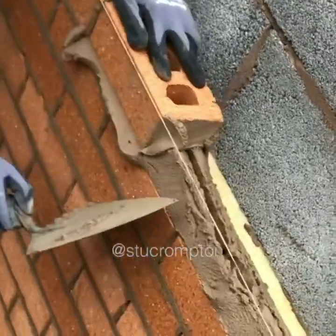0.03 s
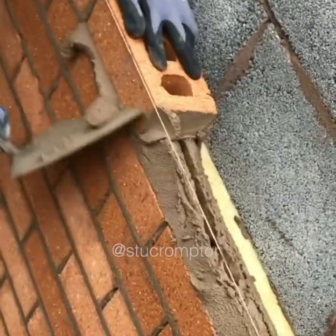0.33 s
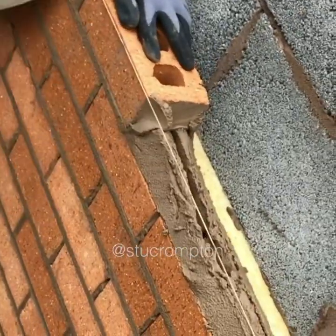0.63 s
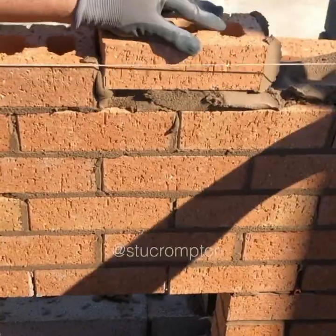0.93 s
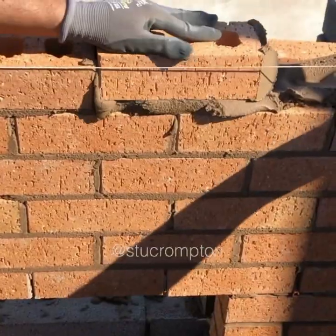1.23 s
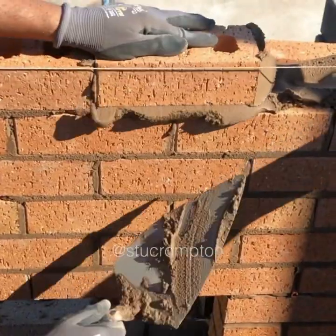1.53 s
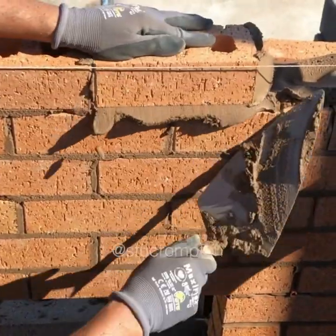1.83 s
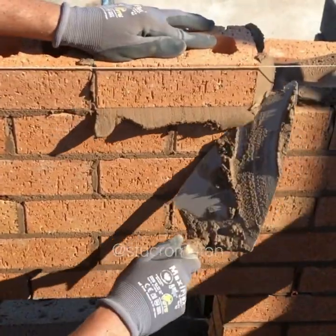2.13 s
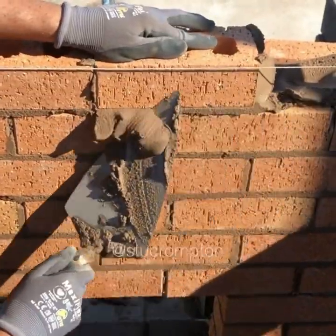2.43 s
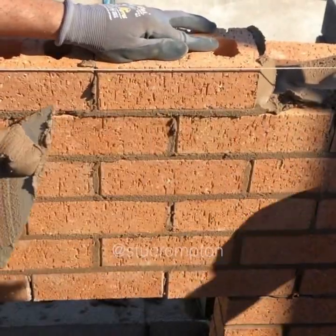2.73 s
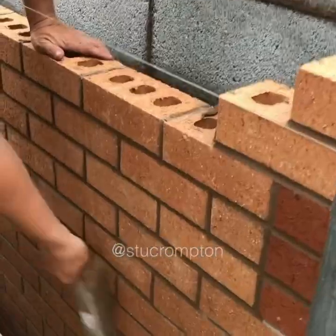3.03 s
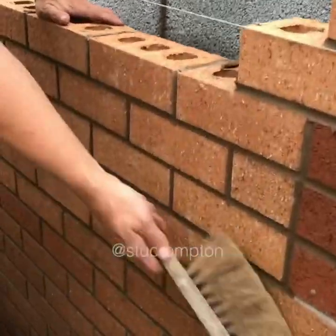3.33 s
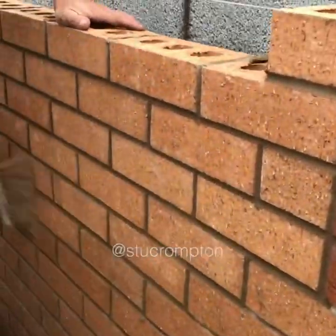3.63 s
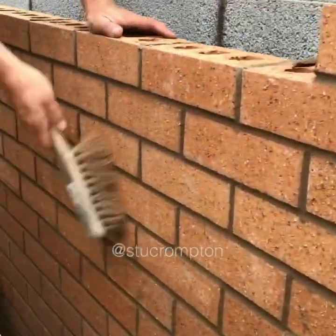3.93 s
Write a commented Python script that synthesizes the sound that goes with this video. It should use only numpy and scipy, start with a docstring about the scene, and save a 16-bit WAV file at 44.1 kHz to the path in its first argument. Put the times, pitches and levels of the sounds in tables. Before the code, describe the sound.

A steel trowel knocks on brick and scrapes through wet mortar, close up outdoors, until about 0.7 seconds. A brick rubs softly into place around 1 second. Two more gritty, squelching strokes with taps follow at 1.2 to 1.6 and 2 to 2.8 seconds. A hand brush sweeps faintly near 3, knocks at 3.4, then rasps louder from 3.7 to 4. Soft bumps, hiss and air rumble lie underneath.

```python
"""Outdoors at a brick wall, one mono microphone close to the bricklayer's hands. A steel trowel knocks on the
bricks and cuts off wet mortar in three gritty strokes: sand cracks, the mortar squelches, the blade rings
faintly. After the first stroke a brick rubs into its bed. Last, a hand brush knocks on the wall and its
bristles sweep the joints. Soft bumps, hiss and a light rumble of air on the microphone lie underneath."""
import sys
import numpy as np
from scipy import signal
from scipy.fft import rfft, irfft, next_fast_len
from scipy.io import wavfile

SR = 44100
rng = np.random.default_rng(int(sys.argv[2]) if len(sys.argv) > 2 else 0)


def transcribe(signal):
    """Save signal, clipped to [-1, 1], as a 16-bit WAV file at the path in sys.argv[1]."""
    frames = np.atleast_2d(signal).T
    limited = np.clip(frames, -1, 1)
    pcm = np.round(limited * 32767).astype(np.int16)
    wavfile.write(sys.argv[1], SR, pcm)


N = 176400
T = np.arange(N) / SR


def from_db(db):
    """Decibels to gain."""
    return 10 ** (np.asarray(db) / 20)


def rms_one(x):
    """Scale to rms 1."""
    return x / np.sqrt(np.mean(x ** 2) + 1e-20)


def curves(rows):
    """One curve a column; -120 outside the rows' span, unless that ends within 0.1 s of the scene's edge."""
    times, *columns = np.transpose(rows)
    before = -120 if times[0] > .1 else None
    after = -120 if times[-1] < T[-1] - .1 else None
    return [np.interp(T, times, column, left=before, right=after) for column in columns]


def add(out, start, x):
    """Mix x in at a start in seconds."""
    i = int(start * SR)
    out[i:i + len(x)] += x[:N - i]


def drift(per_s):
    """Smooth random wander of spread 1."""
    knots = rng.standard_normal(4000)
    return rms_one(np.interp(T * per_s, np.arange(len(knots)), knots))


def colour(x, points):
    """Causal filter through (Hz, dB) points, falling steeply past both ends."""
    n = 2 * next_fast_len(len(x) // 2 + 2048)
    hz, db = np.transpose(points)
    octave = np.log2(np.maximum(np.arange(n // 2 + 1) * SR / n, 1))
    marks = np.log2(hz)
    outside = np.abs(octave - np.clip(octave, marks[0], marks[-1]))
    gain = from_db(np.interp(octave, marks, db) - np.minimum(40 * outside, 70))
    cepstrum = irfft(np.log(gain))
    cepstrum[1:n // 2] *= 2  # folded for minimum phase
    cepstrum[n // 2 + 1:] = 0
    return irfft(rfft(x, n) * np.exp(rfft(cepstrum)))[:len(x)]


def noise(db, points):
    """Smooth coloured noise at a level."""
    return from_db(db) * rms_one(colour(rng.standard_normal(N), points))


def grains(per_s, spread_db):
    """Random clicks at steady power, their sizes spread by spread_db."""
    chance = np.clip(per_s / SR, 1e-3, 1)
    sizes = from_db(spread_db * np.minimum(rng.exponential(1, N), 4)) * rng.choice([-1, 1], N)
    return rms_one(sizes * (rng.random(N) < chance) / np.sqrt(chance))


def pinged(clicks, low_hz, high_hz, t60):
    """Turn every click into a short ring at a random pitch."""
    at = np.flatnonzero(clicks)
    t = T[:int(t60 * SR * .6)]
    hz = rng.uniform(low_hz, high_hz, N)[at, None]
    rings = clicks[at, None] * np.sin(2 * np.pi * hz * t) * from_db(-60 * t / t60)
    samples = at[:, None] + np.arange(len(t))
    return rms_one(np.bincount(samples.ravel(), rings.ravel(), N)[:N])


def burst(t60, crack_db):
    """A sharp crack and a dying crumble."""
    t = T[:SR // 8]
    contact = rng.standard_normal(len(t)) * from_db(-60 * t / t60)
    contact /= np.linalg.norm(contact)
    contact[0] += from_db(crack_db)
    return contact


def at_level(x, db):
    """Give a blow the energy of 10 ms at this level."""
    return x / np.linalg.norm(x) * from_db(db) * np.sqrt(SR / 100)


def thuds(rows, rise_s, sag):
    """Damped notes that sink in pitch by the fraction sag as they die."""
    out, t = np.zeros(N), T[:SR // 4]
    for start, hz, db, t60 in rows:
        phase = 2 * np.pi * np.cumsum(hz * (1 - sag * np.minimum(t / t60, 1))) / SR
        envelope = from_db(db - 60 * t / t60) * (1 - np.exp(-t / rise_s))
        add(out, start, envelope * np.sin(phase))
    return out


# Hiss behind the work and air on the microphone. Each row: time in seconds, level in dB.
HISS = [(0, -87), (.705, -87), (.72, -72), (1.2, -63), (1.7, -67.5), (1.83, -74), (2.0, -77), (2.75, -73),
        (2.8, -74), (2.888, -73), (2.896, -52), (2.99, -63), (3.13, -49), (3.24, -51), (3.36, -63),
        (3.43, -53), (4, -45.5)]
RUMBLE = [(0, -52.5), (.55, -45.5), (.76, -47.5), (.79, -58), (.84, -51.5), (1.06, -56.5), (1.18, -48),
          (1.3, -56.5), (2.0, -51.5), (2.07, -42), (2.2, -51), (2.5, -44), (2.65, -57), (2.85, -47.5),
          (3.0, -60), (3.4, -59.5), (3.55, -47.5), (3.66, -58.5), (3.8, -45), (4, -58.5)]
# Their spectra and that of the site. Each row: frequency in Hz, gain in dB.
HISS_COLOUR = [(1500, -26), (2300, -14), (3500, -4.5), (5500, 0), (9000, -1.5), (15800, -5.5)]
RUMBLE_COLOUR = [(20, -25), (40, -8.5), (62, 1.5), (110, -3), (180, -6), (300, -11), (600, -24.5),
                 (1500, -33.5)]
SITE_COLOUR = [(100, 2), (300, 4), (800, 3.5), (1800, -2), (4000, -8.5), (12000, -33)]
def air():
    """Air rumbles unevenly on the microphone, with a shifting hiss and the steady noise of the site."""
    hiss = noise(curves(HISS)[0], HISS_COLOUR)
    rumble = noise(curves(RUMBLE)[0], RUMBLE_COLOUR)
    return hiss + rumble + noise(db=-66.5, points=SITE_COLOUR)


# How the grains ring, squelch first, then sand.
# Each row: lowest and highest pitch in Hz, t60 in seconds, share of plain click in dB.
GRAIN_RINGS = [(126, 3000, 0.037, 2), (2090, 16000, 0.0056, -0.5)]
GRAINS_PER_S, REFERENCE_DB = 4500, -35  # grain rate at this level
def scrape(strokes, colours, spread_db, chatter_db):
    """Sand cracks under the edge while wet mortar squelches; pressure makes the grains denser."""
    out = np.zeros(N)
    chatter = from_db(chatter_db * drift(per_s=160))
    levels = np.max([curves(rows) for rows in strokes], axis=0)
    for db, points, (low, high, t60, click_db) in zip(levels, colours, GRAIN_RINGS):
        per_s = GRAINS_PER_S * from_db(.7 * (np.maximum(db, -55) - REFERENCE_DB))
        clicks = rms_one(grains(per_s, spread_db) * chatter)
        grit = pinged(clicks, low, high, t60) + from_db(click_db) * clicks
        out += from_db(db) * rms_one(colour(grit, points))
    return out


# The first stroke, close up. Each row: time in seconds, squelch level in dB, sand level in dB.
THICK_STROKE = [(0, -52.5, -94), (.228, -50, -86), (.25, -46.5, -54), (.335, -46.5, -49), (.40, -36, -41),
                (.46, -33, -33), (.505, -37.5, -34), (.53, -35, -41), (.555, -49, -43.5),
                (.575, -41.5, -67), (.65, -51.5, -68), (.71, -56.5, -76), (.76, -90, -63)]
# Spectra of its squelch and sand. Each row: frequency in Hz, gain in dB.
THICK_SQUELCH = [(150, -6), (280, -3), (420, 3), (600, 0), (920, 5), (1300, 0.5), (1700, 2.5),
                 (2100, -11.5), (2600, -16.5)]
THICK_SAND = [(1410, 13.5), (2400, -3), (3630, -6), (4170, -12), (6760, -17.5), (12400, -31.5),
              (15000, -42)]
def thick_stroke():
    """The trowel cuts dully through thick mortar."""
    return scrape([THICK_STROKE], (THICK_SQUELCH, THICK_SAND), spread_db=2, chatter_db=0)


# Modes of the steel blade. Each row: frequency in Hz, gain in dB, t60 in seconds.
BLADE_MODES = [(2439, 0, .07), (2940, 2, .04), (6169, 2, .09), (6481, 4, .08), (6531, 3, .08),
               (6670, 2, .07), (7595, 3, .08), (7806, 0, .08), (9080, -3, .05), (11779, 2, .09)]
def blade(contact):
    """The steel rings with whatever its edge meets; returns the contact with its ringing."""
    ringing = np.zeros(N)
    for hz, db, t60 in BLADE_MODES:
        radius = from_db(-60 / (t60 * SR))
        zeros = (1 - radius ** 2) / 2 * np.array([1, 0, -1])  # gain 1 at the peak
        poles = [1, -2 * radius * np.cos(2 * np.pi * hz / SR), radius ** 2]
        ringing += from_db(db) * signal.lfilter(zeros, poles, contact + 1e-18)
    return contact + from_db(-5.5) * ringing


def chips(low_hz, high_hz, count, t60):
    """Flakes of grit ring at random pitches after a contact, with unit energy in all."""
    t = T[:SR // 8]
    hz, phase = rng.uniform(low_hz, high_hz, (count, 1)), rng.random((count, 1))
    rings = np.sin(2 * np.pi * (hz * t + phase)).sum(axis=0) * from_db(-60 * t / t60)
    return rings / np.linalg.norm(rings)


# Four bands of a tap (body, knock, crack, tick): their edges in Hz, then their t60 in seconds.
BAND_EDGES_HZ = [300, 800, 2400, 6000, 14000]
BAND_T60_S = [0.06, 0.016, 0.024, 0.012]
# Close trowel knocks and one click. Each row: start in seconds, then body, knock, crack and tick in dB.
TAPS = [(0.242, -44.5, -43.5, -59.5, -76), (0.268, -62, -44, -64, -82), (0.29, -66, -39.5, -55, -63),
        (0.316, -38, -39, -54, -69), (0.346, -37, -34, -49, -63), (0.605, -47, -48, -77, -90),
        (.729, -68, -69, -66.5, -65), (0.808, -65, -54.5, -62.5, -75), (1.236, -43, -48.5, -40.5, -37.5),
        (1.28, -54, -44, -44.5, -52), (1.324, -57, -41, -42.5, -47), (1.4236, -37.5, -50, -62, -32.5),
        (1.458, -43, -63, -45.5, -42), (1.5583, -48, -53, -46, -37), (1.793, -50.5, -60, -64.5, -76),
        (2.032, -43, -38, -41.5, -29.5), (2.117, -53, -43.5, -48, -48), (2.157, -63, -42.5, -48, -46),
        (2.225, -69, -42.5, -42, -46), (2.271, -64, -40.5, -39, -41.5), (2.285, -66, -46.5, -43, -38.5),
        (2.330, -41, -38.5, -34.5, -27.5), (2.362, -46, -35.5, -46, -49), (2.677, -57, -43.5, -43, -42)]
def taps():
    """Trowel knocks on brick, plus one faint, thin click at 0.73 s; each has its own balance of bands."""
    out = np.zeros(N)
    for k, (low, high, t60) in enumerate(zip(BAND_EDGES_HZ, BAND_EDGES_HZ[1:], BAND_T60_S)):
        band = signal.butter(3, [low, high], "band", fs=SR, output="sos")
        for start, *levels in TAPS:
            tap = burst(t60, crack_db=-2) + from_db(-7.5) * chips(low, high, count=4, t60=.065)
            add(out, start, at_level(signal.sosfilt(band, tap), levels[k]))
    return out


# Short rings of the struck brick and, on the light contacts from 2.17 to 2.27 s, of the blade tip.
# Each row: start in seconds, pitch in Hz, level in dB, t60 in seconds.
CONTACT_RINGS = [(.243, 1244, -28, 0.072), (0.269, 1380, -32.5, 0.1), (0.317, 1380, -29.5, 0.073),
                 (.348, 2100, -30.5, 0.059), (1.236, 1038, -26.5, 0.058), (1.28, 1030, -27, 0.045),
                 (1.326, 1046, -25, 0.051), (2.174, 3040, -38, 0.065), (2.242, 2915, -30.5, 0.042),
                 (2.27, 2080, -32.5, .06), (2.331, 947, -29, 0.072), (2.334, 1503, -25.5, 0.045),
                 (2.567, 913, -29, 0.07)]
def contact_rings():
    """As the trowel meets the joint, brick or blade tip rings in a close pair of quickly dying modes."""
    upper_modes = [(start, hz * 1.074, db - 3, t60) for start, hz, db, t60 in CONTACT_RINGS]
    return thuds(list(CONTACT_RINGS) + upper_modes, rise_s=.0007, sag=.011)


# Suction in the mortar. Each row: start in seconds, pitch in Hz, level in dB, t60 in seconds.
SUCKS = [(.441, 413, -26, 0.035), (.972, 380, -27.5, 0.017), (1.427, 478, -20.5, 0.038),
         (1.457, 488, -29.5, 0.1), (1.495, 474, -38.5, 0.1), (2.333, 366, -24.5, 0.079),
         (2.61, 452, -26, 0.053)]
def sucks():
    """The wet joint sucks open with a hollow note."""
    return thuds(SUCKS, rise_s=.0022, sag=.087)


# Bumps under the work. Each row: start in seconds, pitch in Hz, level in dB, t60 in seconds.
BUMPS = [(.62, 86, -40, 0.095), (.725, 133, -35.5, 0.057), (.976, 167, -25.5, 0.043),
         (1.0, 109, -31, 0.054), (2.045, 102, -37, 0.17), (2.53, 122, -27.5, 0.053),
         (2.765, 95, -29.5, 0.068), (2.81, 156, -23, 0.032), (2.839, 296, -10.5, 0.0087),
         (2.848, 80, -31, 0.11), (2.872, 145, -23, 0.063), (3.055, 115, -32, 0.094),
         (3.48, 264, -31, 0.021), (3.495, 185, -32, 0.072)]
def bumps():
    """Soft low bumps that drop steeply in pitch."""
    return thuds(BUMPS, rise_s=.0022, sag=.55)


# The sliding brick. Each row: time in seconds, level in dB, lowest resonance in Hz.
BEDDING = [(.82, -67, 1610), (.91, -59, 1670), (.965, -53.5, 1806), (1.11, -57, 1835), (1.16, -55, 1895)]
# Its resonances. Each row: multiple of the lowest, gain in dB.
BEDDING_MODES = [(1, -1.5), (1.26, -16), (1.669, -17)]
# The broad noise of its rubbing. Each row: frequency in Hz, gain in dB.
BEDDING_COLOUR = [(250, 5), (500, -5.5), (1000, -3), (2000, -8), (9000, -23)]
def bedding(width_hz=380):
    """The brick slides into its bed; its resonances climb as it is pressed home."""
    db, hz = curves(BEDDING)
    phase = 2 * np.pi * np.cumsum(hz) / SR
    resonances = np.zeros(N)
    for ratio, mode_db in BEDDING_MODES:
        narrow_noise = drift(width_hz) * np.sin(ratio * phase) + drift(width_hz) * np.cos(ratio * phase)
        resonances += from_db(mode_db) * narrow_noise
    return (from_db(db) * resonances + noise(db, BEDDING_COLOUR)) / np.sqrt(2)


# The later strokes, one list a drag; the last two drags join into one stroke.
# Each row: time in seconds, squelch level in dB, sand level in dB.
EDGE_STROKES = [
    [(1.236, -41.5, -44.5), (1.315, -43.5, -49), (1.345, -39, -41.5), (1.405, -41, -38.5),
     (1.45, -42.5, -43.5), (1.53, -43, -45.5), (1.585, -49, -47), (1.61, -60.5, -70), (1.8, -61, -68)],
    [(2.02, -50, -52), (2.06, -63, -64), (2.105, -76, -72), (2.14, -51, -55), (2.18, -49.5, -46.5),
     (2.25, -48.5, -52.5), (2.322, -52, -55.5), (2.335, -39, -42), (2.358, -42, -47)],
    [(2.362, -36, -34), (2.38, -42, -32), (2.44, -41, -30), (2.475, -37.5, -29), (2.51, -38, -28),
     (2.575, -38.5, -30), (2.595, -39, -30.5), (2.665, -43, -37), (2.71, -55.5, -53.5), (2.755, -46, -45.5),
     (2.79, -82, -83)],
]
# Spectra of their squelch and sand. Each row: frequency in Hz, gain in dB.
EDGE_SQUELCH = [(150, -7.5), (260, -8.5), (350, 0.5), (470, -1), (600, 2.5), (730, -14.5), (950, -0.5),
                (1300, -3), (1600, -5), (2000, -13.5), (2600, -12.5)]
EDGE_SAND = [(2400, -11), (3200, -4.5), (4800, -4.5), (6600, -0.5), (8300, 1.5), (10500, -5), (12700, -5.5),
             (15800, -6.5)]
def edge_strokes():
    """The trowel's edge drags along the brick face, bright and chattering."""
    return scrape(EDGE_STROKES, (EDGE_SQUELCH, EDGE_SAND), spread_db=3, chatter_db=1.5)


# Lumps of grit. Each row: start and length in seconds, then knock, crack and tick levels in dB.
CRUNCHES = [(1.358, 0.011, -37.5, -47, -37.5), (1.373, .014, -46, -45, -32),
            (1.4828, 0.0097, -50, -42, -38.5), (2.172, 0.025, -44, -59, -45.5),
            (2.239, 0.018, -45, -44, -39), (2.302, 0.017, -49, -48, -42), (2.376, 0.011, -55, -56, -31.5),
            (2.472, 0.013, -40, -37, -26.5), (2.564, 0.026, -37, -30.5, -28.5)]
def crunches(cracks_per_s=8300):
    """A lump of grit is crushed under the edge: a quick swell of tiny cracks."""
    out, t = np.zeros(N), T[:SR // 20]
    for k, (low, high) in enumerate(zip(BAND_EDGES_HZ[1:], BAND_EDGES_HZ[2:])):
        band = signal.butter(2, [low, high], "band", fs=SR, output="sos")
        for start, length, *levels in CRUNCHES:
            cracks = rng.standard_normal(len(t)) * (rng.random(len(t)) < cracks_per_s / SR)
            swell = np.sin(np.pi * np.sqrt(np.minimum(t / length, 1)))
            add(out, start, at_level(signal.sosfilt(band, cracks * swell), levels[k]))
    return out


# The flat of the blade, faint even this close. Each row: time in seconds, level in dB.
RUB = [(1.65, -70), (1.684, -48), (1.71, -61.5), (1.77, -55.5), (1.82, -92), (1.92, -67), (1.985, -53.5),
       (2.02, -65)]
# Its spectrum. Each row: frequency in Hz, gain in dB.
RUB_COLOUR = [(1000, -1.5), (3500, 1.5), (6500, -6.5), (14000, -17)]
def blade_rub():
    """The flat of the blade rubs softly between strokes."""
    return noise(curves(RUB)[0], RUB_COLOUR)


# Bristles on the brick, one list a sweep, and their tips rasping in the joints.
# Each row: time in seconds, level in dB.
SWEEPS = [
    [(2.89, -50), (2.94, -46.5), (2.98, -53.5), (3.04, -55), (3.12, -66)],
    [(3.47, -77), (3.5, -49.5), (3.55, -64), (3.6, -57.5), (3.66, -52), (3.69, -36), (3.718, -34),
     (3.74, -32.5), (3.81, -33), (3.89, -32), (3.94, -35), (4, -33.5)],
]
RASP = [(3.67, -71), (3.70, -41), (3.72, -24.5), (3.742, -33), (3.80, -29.5), (3.86, -34), (4, -38.5)]
# Their spectra. Each row: frequency in Hz, gain in dB.
SWEEP_COLOUR = [(150, -13), (280, -4.5), (450, 2), (700, -1), (1000, -3.5), (1600, -4), (2200, -4),
                (3000, -8.5), (4400, -9), (8000, -20), (15800, -46)]
RASP_COLOUR = [(900, -13.5), (1200, 4.5), (1400, 3), (1600, 5.5), (1900, 0)]
def bristles(flicks_per_s=7000):
    """Thousands of bristles flick over the brick and rasp in the joints."""
    sweep_db = np.max([curves(rows)[0] for rows in SWEEPS], axis=0)
    flicks = grains(flicks_per_s, spread_db=0) * from_db(drift(per_s=90))
    sweep = from_db(sweep_db) * rms_one(colour(flicks, SWEEP_COLOUR))
    tips = grains(flicks_per_s, spread_db=0)
    rasp = from_db(curves(RASP)[0]) * rms_one(colour(tips, RASP_COLOUR))
    return sweep + rasp


# Wood on brick, close up. Each row: start in seconds, level in dB, brightness in dB per octave.
BRUSH_KNOCKS = [(3.4143, -29.5, 3), (3.56, -42, -4), (3.627, -44, -6)]
# The spectrum of a knock before that tilt. Each row: frequency in Hz, gain in dB.
BRUSH_KNOCK_COLOUR = [(200, -15), (600, 0), (1200, -5), (2100, -1.5), (4000, 0.5), (5500, -12.5),
                      (8000, -13), (15000, -44)]
def brush_knocks():
    """The wooden back of the brush knocks on the wall."""
    out = np.zeros(N)
    for start, db, tilt in BRUSH_KNOCKS:
        points = [(hz, gain_db + tilt * np.log2(hz)) for hz, gain_db in BRUSH_KNOCK_COLOUR]
        knock = colour(burst(t60=.034, crack_db=-4), points)
        add(out, start, at_level(knock, db))
    return out


def wall_echo(x, db, delay_s, cutoff_hz):
    """One dull echo off the brickwork reaches the microphone just after the direct sound."""
    late = np.interp(T - delay_s, T, x, left=0)
    return from_db(db) * signal.sosfilt(signal.butter(1, cutoff_hz, fs=SR, output="sos"), late)


def reflections(x, db, t60):
    """Dull scatter from the surrounding masonry."""
    t = T[:SR // 3]
    scatter = signal.lfilter([1], [1, -.5], rng.standard_normal(len(t)))
    tail = scatter * from_db(-60 * t / t60) * (t > .001)
    return from_db(db) * signal.fftconvolve(x, tail / np.linalg.norm(tail))[:N]


def scene():
    """Trowel, mortar and brush close to the microphone, over the air of the site; both channels alike."""
    contact = thick_stroke() + edge_strokes() + taps() + crunches()
    trowel = blade(contact) + contact_rings() + blade_rub()
    mortar = sucks() + bedding()
    brush = bristles() + brush_knocks()
    work = trowel + mortar + brush
    background = air() + bumps()
    echo = wall_echo(work, db=-14.5, delay_s=.00637, cutoff_hz=3600)
    mono = work + echo + reflections(work, db=-18.5, t60=.31) + background
    return np.array([mono, mono])


def record(dry):
    """The top is cut steeply above 16 kHz."""
    return signal.sosfilt(signal.ellip(10, .1, 80, 16000, fs=SR, output="sos"), dry)


dry = scene()
out = record(dry)
transcribe(out)
```